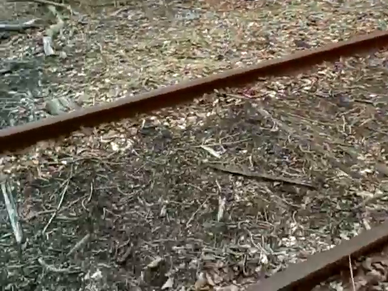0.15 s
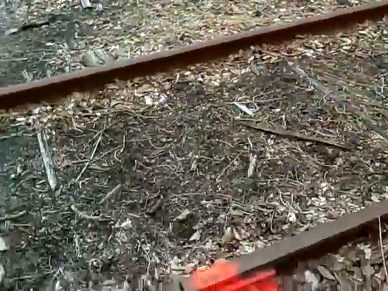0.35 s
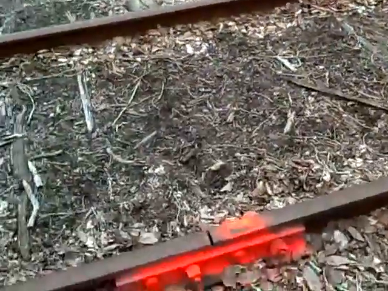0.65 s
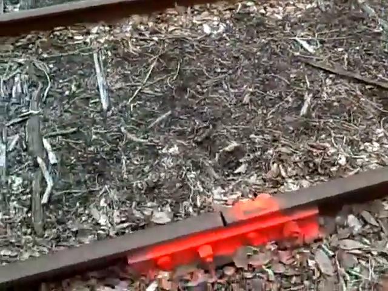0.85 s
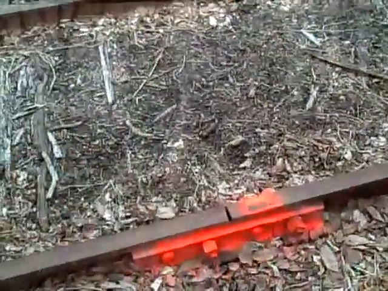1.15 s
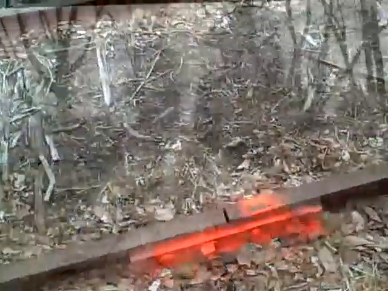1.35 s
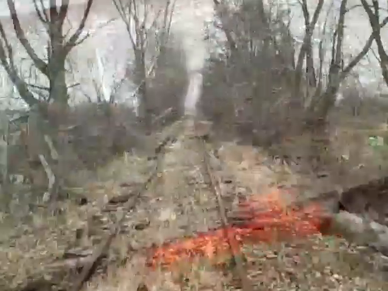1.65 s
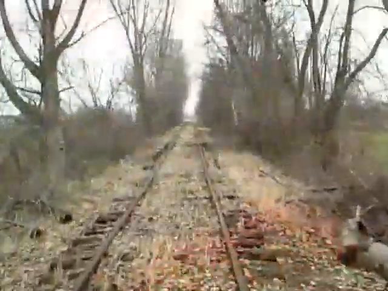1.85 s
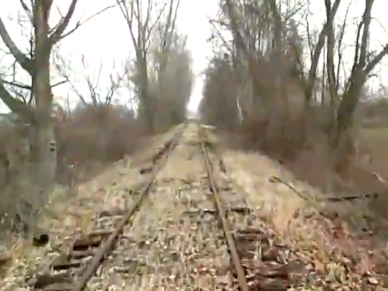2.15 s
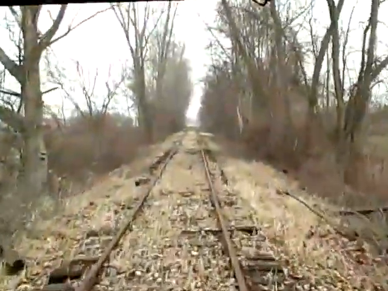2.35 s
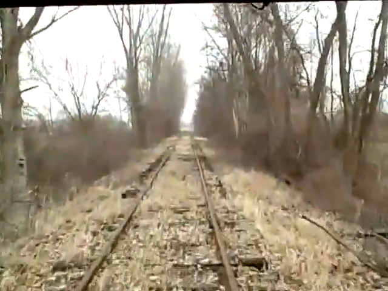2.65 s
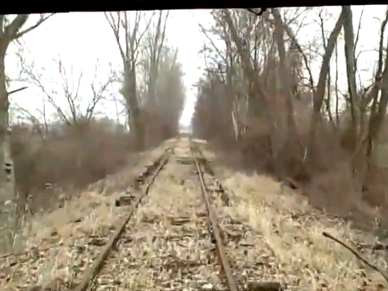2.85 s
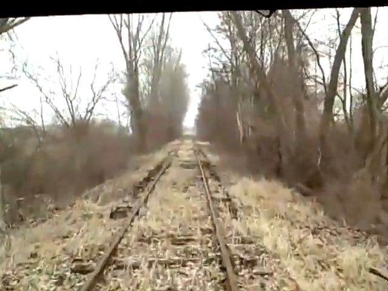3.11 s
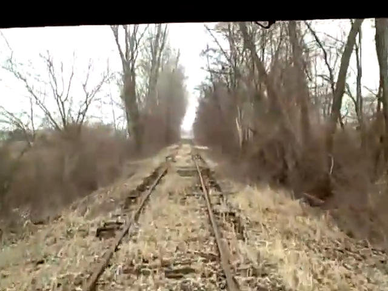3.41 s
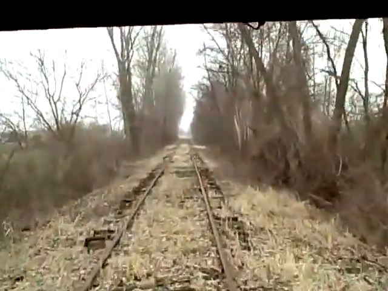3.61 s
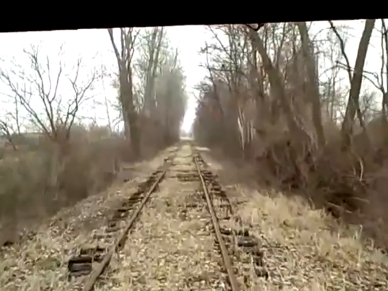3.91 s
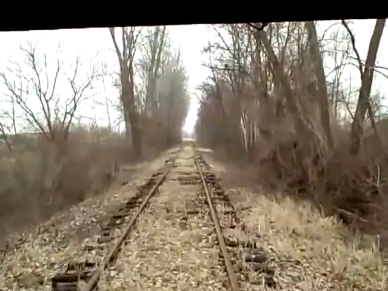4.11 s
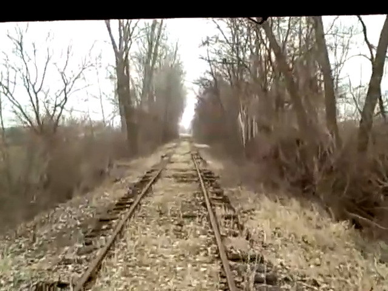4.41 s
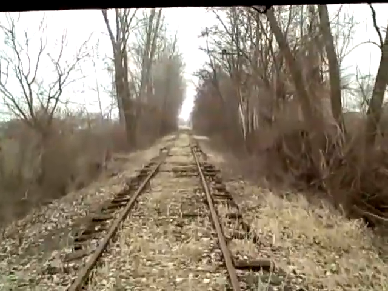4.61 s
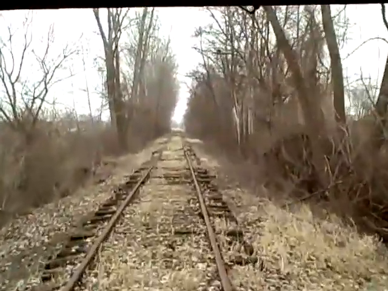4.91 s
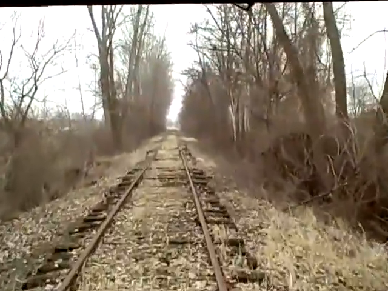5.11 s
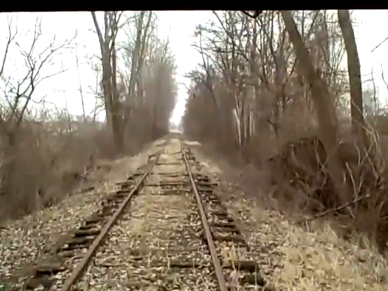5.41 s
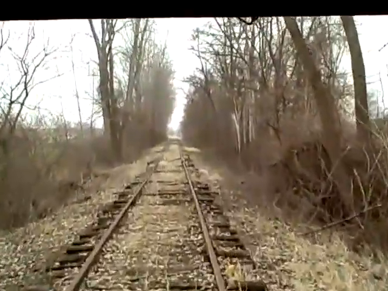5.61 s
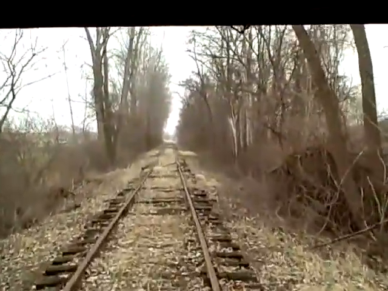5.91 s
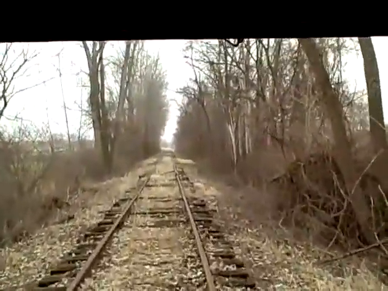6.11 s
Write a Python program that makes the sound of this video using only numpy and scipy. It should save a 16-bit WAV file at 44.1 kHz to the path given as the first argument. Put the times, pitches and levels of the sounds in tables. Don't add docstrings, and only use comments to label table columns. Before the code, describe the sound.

Lumpy engine idle with ticking valves gives way to a louder rolling ride, rail joints clanking and booming, engine surging at the end.

```python
import sys
import numpy as np
from scipy import signal
from scipy.fft import rfft, irfft, next_fast_len
from scipy.io import wavfile
from scipy.ndimage import map_coordinates

SR = 44100
rng = np.random.default_rng(int(sys.argv[2]) if len(sys.argv) > 2 else 0)


def boost(x):
    u = np.asarray(x, float) / 20
    return 10 ** u


def waveform_to_disk(signal):
    frames = np.transpose(np.atleast_2d(signal))
    scaled = np.clip(frames, -1, 1) * 32767
    samples = np.round(scaled).astype(np.int16)
    wavfile.write(sys.argv[1], SR, samples)


N = 276058
T = np.arange(N) / SR

# time_s, cycles_done
IDLE_CRANK = [(-.1411, -1), (2.0338, 17)]
# time_s, cycles_done
RIDE_CRANK = [(.993, 0), (1.718, 6), (2.694, 14), (3.666, 22), (4.279, 27), (4.769, 31), (5.256, 35),
              (5.742, 39), (6.347, 44)]
IDLE_SAG_DB_PER_S = 1.87


def unit(x):
    return x / np.sqrt(np.mean(x ** 2) + 1e-20)


def curve(rows):
    time_s, values = np.transpose(rows)
    return np.interp(T, time_s, values)


def wobble(rate_hz):
    knots = rng.standard_normal(int(N * rate_hz / SR) + 4)
    return map_coordinates(knots, [T * rate_hz])


def filtered(x, response):
    size = next_fast_len(N + SR // 2)
    hz = np.fft.rfftfreq(size, 1 / SR)
    return irfft(rfft(x, size) * response(hz), size)[:N]


def modes(table):
    def response(f):
        return sum(boost(db) * 1j * f * width / (centre ** 2 - f ** 2 + 1j * f * width)
                   for centre, width, db in table)
    return response


def noise(spectrum, case=()):
    freq_hz, db = np.transpose(spectrum)

    def colour(hz):
        smooth_db = np.interp(np.log(hz + 1), np.log(freq_hz + 1), db)
        return boost(smooth_db) * (1 + modes(case)(hz))
    return unit(filtered(rng.standard_normal(N), colour))


def moments(crank, share):
    time_s, cycles = np.transpose(crank)
    return np.interp(np.arange(cycles[0], cycles[-1]) + share, cycles, time_s)


def scattered_moments(crank, share):
    when = moments(crank, share)
    return zip(when, rng.standard_normal((len(when), 2)))


def add(x, start_s, shape):
    i = round(start_s * SR)
    if 0 <= i < len(x):
        x[i:i + len(shape)] += shape[:len(x) - i]


def swell(rise_s, length_s):
    t = np.arange(SR // 8) / SR
    return (1 - np.exp(-t / rise_s)) * np.exp(-(t / length_s) ** 2)


def hunt(s):
    return np.cos(2 * np.pi * (s - .14) / .345)


def exhaust(crank, fire, pipe):
    blows = np.zeros(N)
    puff = signal.windows.gaussian(round(.016 * SR), .00205 * SR)
    half_puff_s = len(puff) / 2 / SR
    for share, db, scatter_db, scatter_s, hunt_db in fire:
        for s, (a, b) in scattered_moments(crank, share):
            blow_db = db + scatter_db * a + hunt_db * hunt(s)
            add(blows, s + scatter_s * b - half_puff_s, boost(blow_db) * puff)
    return unit(filtered(blows, modes(pipe)))


def clatter(crank, valves, hiss, case, grain_db, bright_hz, fizz_db):
    # freq_hz, db_per_hz
    air = [(8000, -40), (11000, 0), (13000, -2), (16000, -5)]
    gate = np.zeros(N)
    for share, db, rise_s, length_s in valves:
        for s, (a, b) in scattered_moments(crank, share):
            add(gate, s + .0015 * b, boost(db + .6 * a) * swell(rise_s, length_s))
    gate *= boost(grain_db * wobble(550))
    bursts = filtered(gate * noise(hiss, case), lambda f: 1j * f / (bright_hz + 1j * f))
    fan = boost(0.25 * wobble(40)) * noise(hiss, case)
    fizz = unit((1 + 0.51 * gate) * noise(air))
    return unit(bursts + fan) + boost(fizz_db) * fizz


def whine(crank, waver_rad):
    cycles = curve(crank)
    phase = 2 * np.pi * 60 * cycles + waver_rad * wobble(20)
    return boost(1.2 * wobble(9)) * np.sin(phase)


def panel_flutter():
    beat_db = -4 * hunt(T) + 5 * np.cos(2 * np.pi * (curve(IDLE_CRANK) - .33))
    panel_modes = modes([(174, 24, 1), (118, 25, -3), (205, 25, -5)])
    return boost(-34 + beat_db) * unit(filtered(rng.standard_normal(N), panel_modes))


def standing():
    # share_of_cycle, level_db, scatter_db, scatter_s, hunt_db
    idle_fire = [
        (.034, 0, .4, .0003, 0),
        (.3, -1, .7, .0008, 3),
        (.69, -8, 1.5, .001, 0),
    ]
    # share_of_cycle, level_db over the hiss, rise_s, length_s
    idle_valves = [(0.146, 5, 0.0027, .014), (0.463, 9, 0.0047, 0.023), (0.785, 6, 0.0018, 0.024)]
    # centre_hz, width_hz, level_db
    idle_pipe = [(53, 23, 1.3), (67.8, 4, .6), (90.1, 4, -1), (138, 5, 6), (172.4, 4, 16)]
    # centre_hz, width_hz, level_db over the clatter
    idle_case = [(1690, 60, -4), (2026, 69, -0.5), (4040, 67, -5.5), (4580, 71, -8)]
    # freq_hz, db_per_hz
    idle_hiss = [(590, -38), (1000, -10.5), (1500, -8), (2070, -10.5), (3170, -9), (4530, -5.5),
                 (5030, -5.5), (6190, -1.5), (7980, -12), (10100, -6), (15800, -39)]
    # freq_hz, db_per_hz
    block_hum = [(150, -37), (220, -11), (300, -5), (420, -4.5), (600, -9), (700, 1), (850, -3.5),
                 (1100, -22), (1600, -35)]
    thump = boost(-26.5) * exhaust(IDLE_CRANK, idle_fire, idle_pipe)
    murmur = boost(-36) * noise([(10, -30), (25, -3), (70, 0), (200, -10), (400, -40)])
    murmur += boost(-35.5 + 1.9 * wobble(25.1)) * noise(block_hum)
    metal = clatter(IDLE_CRANK, idle_valves, idle_hiss, idle_case, grain_db=2.5, bright_hz=2220, fizz_db=-12.5)
    clatter_db = -24.5 - IDLE_SAG_DB_PER_S * T
    return thump + panel_flutter() + murmur + boost(clatter_db) * metal


def cab_db(level_db, per_effort, per_shake):
    # time_s, effort_db
    throttle = [(1.9, -0.4), (2.5, 0.7), (3.6, -0.3), (4.3, 0), (5.1, -0.2), (5.5, 4.5), (5.8, 8.5),
                (6.26, 8.5)]
    # time_s, shake_db
    track = [(1.5, -2), (1.9, -2.5), (2.3, 0.5), (2.7, 0), (3.1, -0.2), (3.5, 0.5), (3.9, -2.5),
             (4.3, -1.8), (4.7, -4), (5.1, -4), (5.5, 0.2), (5.8, 1.1), (6.26, 0.1)]
    return level_db + per_effort * curve(throttle) + per_shake * curve(track)


def tappet(crank, share, hz, t60_s):
    out = np.zeros(N)
    t = np.arange(SR // 10) / SR
    for s, (a, b) in scattered_moments(crank, share):
        envelope = boost(.8 * a - 60 * t / t60_s) * (1 - np.exp(-t / .003))
        pitch_hz = hz + 30 * b + 9000 * (t - .01)
        add(out, s, envelope * np.sin(2 * np.pi * pitch_hz * t))
    return out


def rolling():
    # freq_hz, db_per_hz
    roll_spectrum = [(4.7, -32), (8.0, -26), (21, -6.5), (97, -3.5), (164, -4.5), (284, -17), (361, -12.5),
                     (450, -15), (491, -17), (524, -17.5), (927, -25.5), (1150, -32.5), (1500, -35),
                     (1950, -35.5), (3300, -120)]
    roll = boost(cab_db(-12.5, 0.011, 0.82) + 0.83 * wobble(8)) * noise(roll_spectrum)
    sway = noise([(4, -11), (12, 12.5), (28, 8.5), (42, -5.0), (60, 3), (120, -36)])
    return roll + boost(cab_db(-15, .01, 1.35)) * sway


def riding():
    # share_of_cycle, level_db, scatter_db, scatter_s, hunt_db
    ride_fire = [
        (.02, 0, 1.2, .0006, 0),
        (.282, -2.6, 1.5, .001, 1.5),
        (.653, -4.5, 1.5, .001, 0),
    ]
    # share_of_cycle, level_db over the hiss, rise_s, length_s
    ride_valves = [(.12, 1, .005, .016), (.44, 4.5, .014, .032), (.815, 2, .0004, .004),
                   (.825, 6.5, .002, .019)]
    # centre_hz, width_hz, level_db
    ride_pipe = [(48.5, 4, -4), (64.4, 30, -3), (89.5, 6, 0), (106.4, 4, 5.5), (132.8, 10, 0), (165, 16, 5),
                 (198, 21, 3)]
    # centre_hz, width_hz, level_db over the clatter
    ride_case = [(2790, 110, -11), (3300, 280, -9.5), (4100, 88, -0.5)]
    # freq_hz, db_per_hz
    ride_hiss = [(650, -39), (1100, -10.5), (1920, -8.5), (2300, -8), (3130, -7.5), (3540, -10), (6050, -2),
                 (7400, -10), (8050, -14.5), (10100, -6), (11400, -16.5), (15800, -38)]
    thump = boost(cab_db(-14.5, 0.66, .27)) * exhaust(RIDE_CRANK, ride_fire, ride_pipe)
    metal = clatter(RIDE_CRANK, ride_valves, ride_hiss, ride_case, grain_db=1.5, bright_hz=2900,
                    fizz_db=cab_db(-15, .35, .01))
    tappet_db = np.interp(T, [2, 4.2], [0, 3.5])
    metal += boost(tappet_db) * tappet(RIDE_CRANK, .825, hz=3190, t60_s=.06)
    return thump + boost(cab_db(-25.5, 0.98, .01)) * metal + rolling()


def joints():
    # start_s, rattle_db, knock_db, length_s
    joint_blows = [(1.347, -16, -28, 0.092), (1.583, -16.5, -21, 0.035), (1.82, -14, -16.5, 0.11),
                   (2.028, -14, -17, 0.059), (2.27, -13, -21, 0.033), (2.486, -3, -13, 0.047),
                   (2.526, -10, -10.5, 0.059), (2.617, -13, -17.5, 0.041), (2.759, -7, -9, 0.061),
                   (2.81, -24, -22, 0.048), (3.061, -14.5, -18, 0.12), (3.264, -18, -22, 0.019),
                   (3.363, -15, -14, 0.033), (3.548, -5, -19, 0.038), (3.866, -9, -13, 0.028),
                   (4.3794, -20, -28, 0.037), (4.458, -12, -21, 0.02), (5.431, -7, -31, 0.015),
                   (5.563, -21, -17, 0.033)]
    # centre_hz, width_hz, level_db
    body_modes = [(404, 95, -1), (340, 60, -5), (580, 60, -11), (690, 50, -11), (930, 60, -12),
                  (1760, 80, -16)]
    # freq_hz, db_per_hz
    rattle_spectrum = [(500, -21), (900, -6.5), (1800, -4), (3000, -6), (4500, -6), (6000, -1.5),
                       (8000, -12), (10000, -6), (12000, -15), (16000, -13)]
    rattle, knock = np.zeros(N), np.zeros(N)
    for start_s, rattle_db, knock_db, length_s in joint_blows:
        add(rattle, start_s, boost(rattle_db) * swell(.002, length_s))
        add(knock, start_s, boost(knock_db) * swell(0.0018, length_s))
    blows = knock * boost(2.4 * wobble(150)) * rng.standard_normal(N)
    body = unit(filtered(blows, lambda f: modes(body_modes)(f) / (1 + 1j * f / 900)))
    body *= np.sqrt(np.mean(knock ** 2))
    metal = rattle * boost(0.32 * wobble(270)) * noise(rattle_spectrum)
    return boost(-11.0) * metal + boost(-2.5) * body


def thumps():
    # start_s, level_db, pitch_hz
    floor_blows = [
        (1.352, -14, 371),
        (1.876, -15, 408),
        (2.075, -18, 400),
        (2.535, -5, 399),
        (2.79, -5, 420),
        (3.09, -11, 393),
    ]
    out = np.zeros(N)
    t = np.arange(SR // 8) / SR
    for start_s, db, hz in floor_blows:
        boom = np.sin(2 * np.pi * hz * t * (1 - 1.5 * t))
        add(out, start_s, boost(db) * swell(.004, .018) * boom)
    return out


def fade(start_s, end_s):
    return np.clip((T - start_s) / (end_s - start_s), 0, 1)


def scene():
    stand = boost(-1.3) * (1 - fade(1.19, 2.25))
    ride = boost(0.17) * fade(1.11, 1.91)
    idle_whine_db = -33 - 2.1 * IDLE_SAG_DB_PER_S * T
    idle_gear = boost(idle_whine_db) * whine(IDLE_CRANK, 0.96)
    ride_gear = boost(cab_db(-27.5, 0.93, .1)) * whine(RIDE_CRANK, 0.47)
    mix = stand * (standing() + idle_gear) + ride * (riding() + ride_gear)
    return (mix + joints() + thumps())[None]


def top_cut(x):
    return signal.sosfilt(signal.butter(12, 15920, fs=SR, output="sos"), x)


def record(dry):
    x = dry / (1 + np.abs(dry / .998) ** 11) ** (1 / 11)
    return top_cut(x)


dry = scene()
out = record(dry)
waveform_to_disk(out)
```